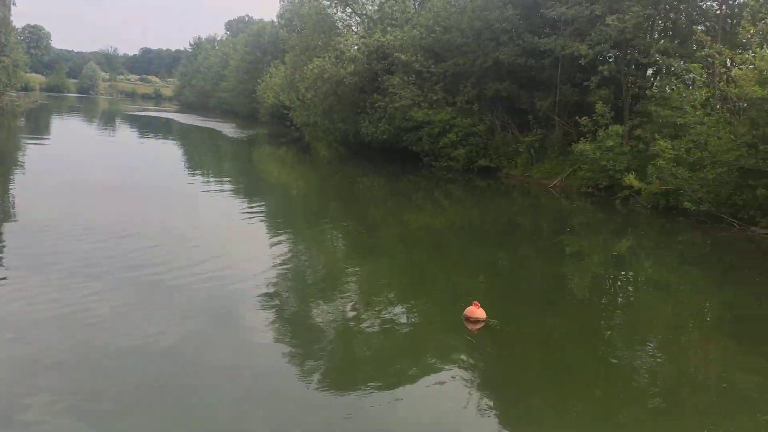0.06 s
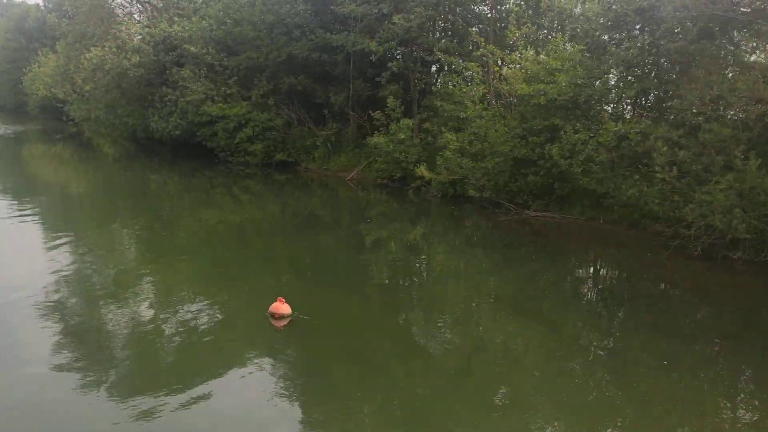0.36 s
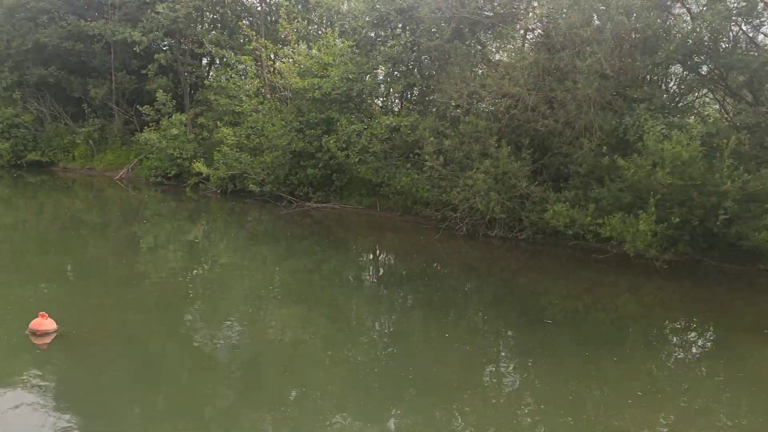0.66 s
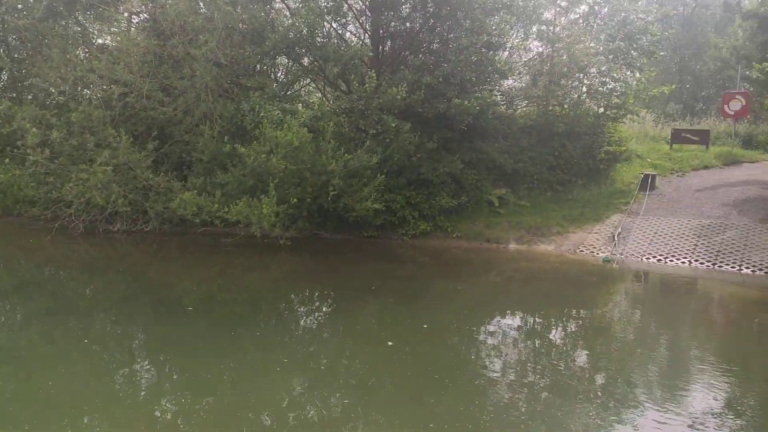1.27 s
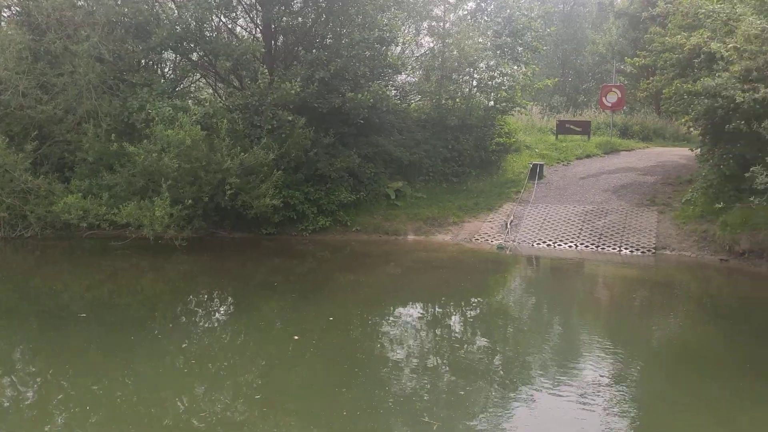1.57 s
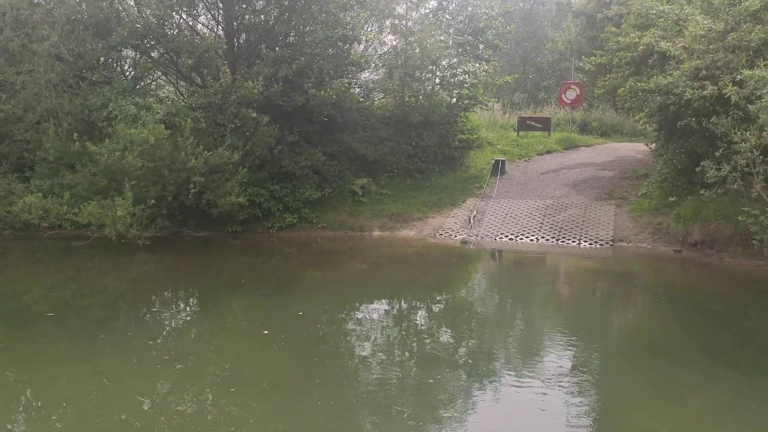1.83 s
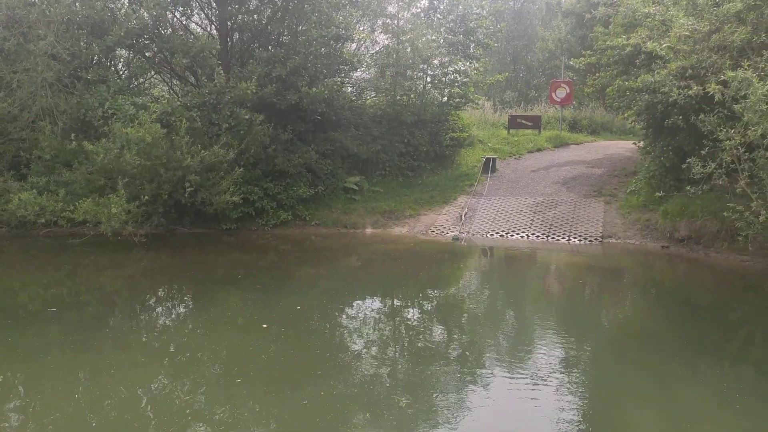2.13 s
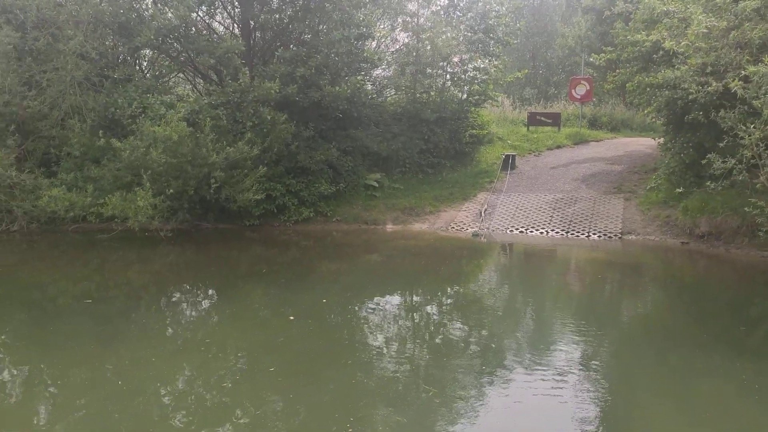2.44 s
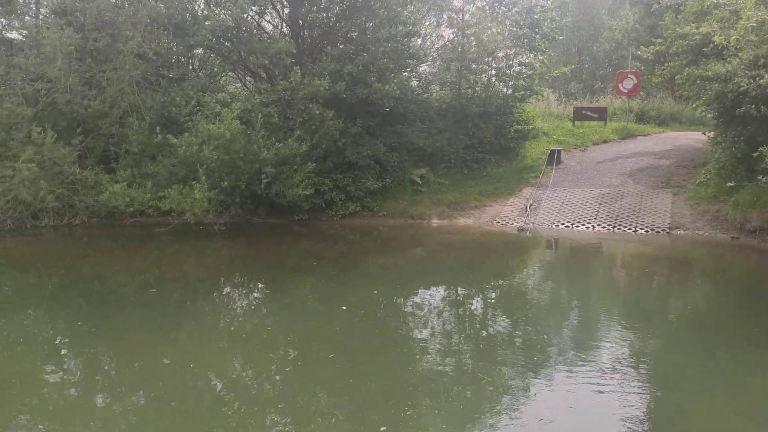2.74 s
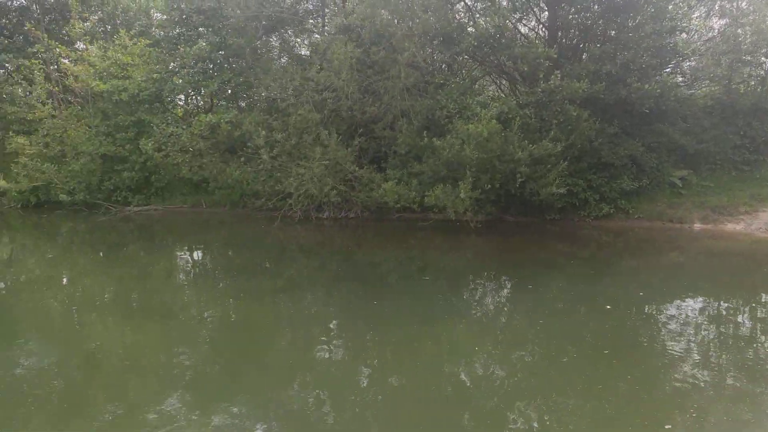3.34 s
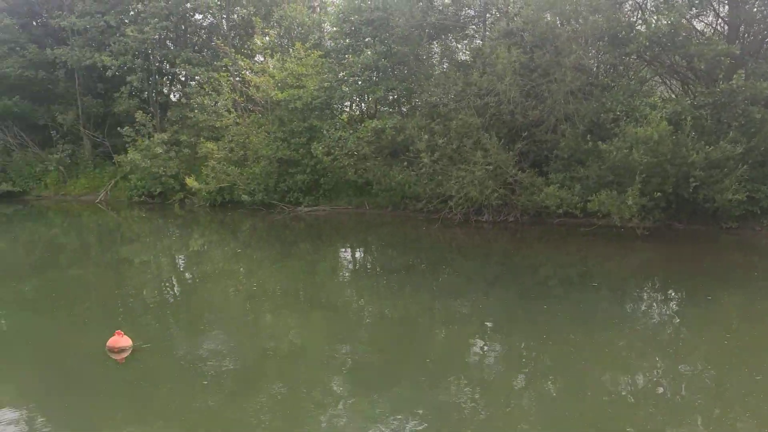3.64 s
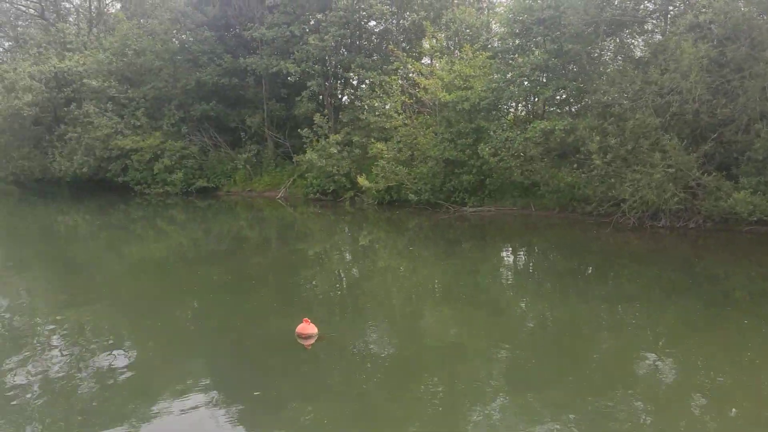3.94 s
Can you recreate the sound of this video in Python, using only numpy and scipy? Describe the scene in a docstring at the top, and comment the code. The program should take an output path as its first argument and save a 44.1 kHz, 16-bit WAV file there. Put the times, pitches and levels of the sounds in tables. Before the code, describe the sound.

Gritty rush of running water close by, with scuffs and knocks on the microphone.

```python
"""On the bank of a calm river, stereo microphones on a camera. From the start a gritty rush like running
water comes close by, in about twenty spurts a second, over a dull far-off drone and a little wind on
the microphones. Soon a hand bumps the camera, and scuffs and knocks follow, mostly on its right side.
The camera turns towards the rush, which slackens halfway and picks up again. Near the end come more
scuffs and a last bump, then a light, long, bright hiss in the rush as the camera turns away."""
import sys
import numpy as np
from scipy import signal
from scipy.fft import rfft, irfft
from scipy.io import wavfile
from scipy.ndimage import map_coordinates

SR = 44100
rng = np.random.default_rng(int(sys.argv[2]) if len(sys.argv) > 2 else 0)


def output_pcm(signal):
    """Save a mono or channel-first signal as 16-bit PCM at the path in sys.argv[1].

    Samples are clipped to [-1, 1] before scaling.
    """
    pcm = np.clip(np.atleast_2d(signal).T, -1, 1) * 32767
    wavfile.write(sys.argv[1], SR, np.round(pcm).astype(np.int16))


N = 176400
T = np.arange(N) / SR
HZ = np.maximum(np.fft.rfftfreq(N, 1 / SR), 1)

# lag of the left microphone as the camera turns towards the rush and back: t/s, delay/s
LEFT_DELAY = [(0, 0.00044), (.8, 0.00039), (1.1, .00029), (1.5, .00021), (2.0, 0.00019), (2.6, 0.0002),
              (3.05, 0.00022), (3.5, 0.0003), (3.75, 0.00036), (4, 0.00037)]
# strength of the close rush: t/s, level/dB
RUSH_LEVEL = [(0, -20), (.38, -17.5), (.6, -18.5), (.83, -21), (1.05, -21.5), (1.2, -21.5), (1.5, -18.3),
              (1.78, -22.5), (1.93, -19.5), (2.06, -27), (2.3, -26.5), (2.6, -19.5), (2.87, -18.5),
              (3.05, -19.5), (3.21, -22.5), (3.5, -23.5), (3.8, -19), (4, -17.5)]
# pace of its spurts: t/s, f/Hz
SPURT_PACE = [(0.0, 17.76), (0.15, 19.03), (0.4, 22.54), (0.6, 20.71), (0.8, 18.96), (1.0, 16.1),
              (1.2, 18.75), (1.45, 24.03), (1.7, 19.49), (1.95, 19.98), (2.2, 21.07), (2.5, 20.82),
              (2.8, 24.31), (3.05, 18.59), (3.3, 21.28), (3.55, 20.34), (3.75, 18.09), (4.0, 19.34)]
# unevenness of the flow, trough to crest of a spurt: t/s, swing/dB
SPURT_SWING = [(0, 1.5), (.3, 4), (1.0, 1.5), (1.25, 4.5), (1.75, 5.5), (2.05, 3), (2.5, 1), (2.95, 5),
               (3.25, -0.5), (3.55, 2), (4, -1)]
# colour of the rush, microphones turned away: f/Hz, left/dB, right/dB
RUSH_OFF_AXIS = [(150, -30, -30), (394, -17, -9), (710, -21, -15), (1230, -18, -14), (1800, -8, -9.5),
                 (2300, -1, -4), (2860, -1.5, -4.5), (3560, 0.5, -2.5), (4600, 1.5, -0.5), (5360, -3, -3),
                 (6200, -3, -3.5), (6760, -13, -16.5), (7560, -34, -13), (10000, -32, -19.5),
                 (12000, -46, -24.5), (14000, -41, -29), (15700, -46, -36)]
# colour of the rush, microphones facing it: f/Hz, left/dB, right/dB
RUSH_ON_AXIS = [(150, -25, -18.5), (395, -19, -19), (696, -18.5, -12.5), (1220, -9.5, -9.5),
                (1800, -3, -6.5), (2370, -1, -4.5), (2790, 3, -3.5), (3420, 1, -2), (3870, -0.5, -4),
                (4670, -3, -1), (5520, -5, -3.5), (6100, -1.5, -5), (6760, -6, -11), (7530, -23.5, -12),
                (10130, -29.5, -20), (12000, -46, -25.5), (14000, -41, -29), (15700, -46, -40)]
# strength of the far drone: t/s, level/dB
FAR_DRONE_LEVEL = [(0, -38.5), (.35, -39), (.9, -39), (1.8, -37.5), (2.15, -41.5), (2.6, -38.5), (3.2, -39),
                   (3.6, -38), (4, -38.5)]
# colour of the far drone: f/Hz, left/dB, right/dB
DRONE_COLOUR = [(30, -21, -26), (85, -8, -5.5), (130, -8, -8.5), (194, -5, -3), (260, -0.5, 0.5),
                (380, 1.5, 3.5), (434, -2, 1), (500, 2.5, 2), (560, -2.5, -1), (674, -4.5, -5.5),
                (1176, -3, -3), (2970, -36, -40), (8000, -37, -40)]
# strength of the whine in the drone: t/s, level/dB
FAR_WHINE_LEVEL = [(0, -39), (.25, -39), (.6, -54), (1.5, -42), (2.2, -52), (2.7, -42), (3.3, -52),
                   (4, -39)]
# strength of the wind on the microphones: t/s, level/dB
BREEZE_LEVEL = [(0, -47), (.8, -50.5), (1.6, -50), (2.2, -48), (3.1, -50.5), (3.6, -68), (4, -59)]
# colour of the wind: f/Hz, left/dB, right/dB
WIND_COLOUR = [(15, 1, 5.5), (35, -5, 1.5), (80, 0.5, -1), (160, -4.5, -4), (400, -26, -21),
               (2000, -60, -60)]
# puffs of wind: t/s, level/dB
WIND_PUFFS = [(.23, -44), (1.2, -40), (2.74, -52)]
# soft bumps of the hand on the camera: t/s, f/Hz, peak level/dB
HAND_BUMPS = [(0.344, 260, -34), (2.07, 186, -39.5), (3.566, 323, -33.5)]
# scuffs and knocks on the camera, except the last row, a light, long, bright hiss in the rush:
# t/s, hold/s, level/dB, release/s, treble gain/dB
SCUFFS_AND_HISS = [(0.486, 0.081, -19.5, 0.1, 2.5), (0.846, 0.0049, -14.5, 0.045, 6),
                   (0.948, 0.065, -18.5, 0.054, -3), (1.028, .005, -20.5, 0.0088, 1),
                   (1.65, 0.0045, -17.5, 0.0066, -26), (1.699, .004, -23, 0.017, -20),
                   (1.894, .02, -19, 0.016, 2), (1.919, 0.025, -15.5, .012, 2.5),
                   (2.152, .005, -24.5, 0.041, -18), (2.237, .01, -32, .03, 3),
                   (2.718, 0.011, -15.5, 0.018, 0), (2.747, 0.018, -18.5, .025, 4),
                   (3.03, .02, -18.5, 0.06, 1.5), (3.256, 0.035, -19.5, .02, 1.5),
                   (3.293, 0.05, -15.5, 0.01, 2.5), (3.38, .012, -25, 0.033, 2),
                   (3.52, 0.0068, -20, 0.014, -2), (3.567, 0.015, -16.5, 0.027, -0.5),
                   (3.627, 0.093, -31, .1, 3)]
# colour of the scuffs and that hiss: f/Hz, left/dB, right/dB
BURST_COLOUR = [(150, -57, -26), (400, -17, -7.5), (800, -16, -9.5), (1720, -9, -8.5), (3300, 2.5, 2),
                (4500, 1.5, 1.5), (6230, 2.5, 0), (7730, -18, -8.5), (9700, -28, -11.5), (11900, -37, -17),
                (13900, -38, -19), (15700, -38, -34)]


def from_db(db):
    """Decibels to gain."""
    return 10 ** (np.asarray(db) / 20)


def unit_rms(x):
    """Scale to unit power."""
    return x / np.sqrt(np.mean(x ** 2) + 1e-20)


def in_time(rows):
    """Join (t/s, value) points by straight lines."""
    return np.interp(T, *np.transpose(rows))


def drift(rate_hz):
    """Random wander with spread 1, mostly slower than rate_hz."""
    return unit_rms(irfft(rfft(rng.standard_normal(N)) / (1 + (HZ / rate_hz) ** 2), N))


def colour(x, table):
    """Filter each side by its column of a spectrum, keeping the power of white noise."""
    hz, *sides = np.transpose(table)
    gains = from_db([np.interp(np.log(HZ), np.log(hz), side) for side in sides])
    return irfft(rfft(x) * unit_rms(gains), N)


def stereo_noise(alike):
    """White noise whose shared part reaches the left microphone later, as the camera turns."""
    shared = rng.standard_normal(N)
    late = map_coordinates(shared, [(T - in_time(LEFT_DELAY)) * SR], order=3, mode="mirror")
    return np.sqrt(alike) * np.array([late, shared]) + np.sqrt(1 - alike) * rng.standard_normal((2, N))


def grit(per_s, spread_db, grain_s, share, alike):
    """Hiss with a share of its power in tiny random bursts; spread_db varies them by burst and side."""
    born = rng.random(N) < per_s / SR
    scatter = np.minimum(rng.exponential(1, N), 4) + 0.68 * rng.standard_normal((2, N))
    bursts = born * from_db(spread_db * scatter) ** 2
    power = signal.lfilter([1], [1, -np.exp(-1 / (grain_s * SR))], bursts + 1e-18)
    return stereo_noise(alike) * np.sqrt(1 - share + share * power / power.mean())


def ring(clicks, hz, t60_s):
    """A unit click sets a sine of height 1 ringing; it falls 60 dB in t60_s."""
    decay, step = from_db(-60 / (t60_s * SR)), 2 * np.pi * hz / SR
    return signal.lfilter([0, np.sin(step)], [1, -2 * decay * np.cos(step), decay ** 2], clicks + 1e-18)


def droplets(per_s=1200, spread_db=3, ring_cycles=16.6, band_hz=(2930, 6720), pitches=24):
    """Tiny pings at many pitches, of unequal strength at the two microphones."""
    born = rng.random(N) < per_s / SR
    signs = rng.choice([-1, 1], N)
    scatter = np.minimum(rng.exponential(1, N), 3.5) + 0.63 * rng.standard_normal((2, N))
    clicks = born * signs * from_db(spread_db * scatter)
    pitch_index = rng.integers(0, pitches, N)
    left, right = sum(np.sqrt(hz) * ring(clicks * (pitch_index == k), hz, ring_cycles / hz)
                      for k, hz in enumerate(np.geomspace(*band_hz, pitches)))
    late_left = np.interp(T - in_time(LEFT_DELAY), T, left)
    return unit_rms(np.array([late_left, right]))


def close_rush(rise_share=0.19, facing_lag_s=0.00034, averted_lag_s=0.00037):
    """Close spatter in spurts that swell fast and sink slower; its colour follows the camera's turn."""
    cycle = (np.cumsum(in_time(SPURT_PACE)) / SR) % 1
    spurt = np.interp(cycle, [0, rise_share, 1], [-.5, .5, -.5])
    level_db = in_time(RUSH_LEVEL) + in_time(SPURT_SWING) * spurt + 0.34 * drift(rate_hz=64)
    hiss = grit(per_s=1500, spread_db=3.5, grain_s=0.00059, share=0.39, alike=0.27)
    spray = from_db(level_db) * (from_db(-2) * hiss + from_db(-9) * droplets())
    averted = np.interp(in_time(LEFT_DELAY), [facing_lag_s, averted_lag_s], [0, 1])
    return (1 - averted) * colour(spray, RUSH_ON_AXIS) + averted * colour(spray, RUSH_OFF_AXIS)


def far_drone(whine_hz=1442, width_hz=16, alike=0.92):
    """A dull drone like far traffic, with a faint whine in it, much alike at both microphones."""
    whine_band = rfft(stereo_noise(alike=0.96)) / (1 + ((HZ - whine_hz) / width_hz) ** 2)
    whine = from_db(in_time(FAR_WHINE_LEVEL)) * unit_rms(irfft(whine_band, N))
    air = np.sqrt(alike) * rng.standard_normal(N) + np.sqrt(1 - alike) * rng.standard_normal((2, N))
    return from_db(in_time(FAR_DRONE_LEVEL)) * colour(air, DRONE_COLOUR) + whine


def microphone_wind(gust_db=3.5, puff_s=0.014):
    """Light lumpy rumble of wind right on the microphones, with a few puffs."""
    breeze = from_db(in_time(BREEZE_LEVEL) + gust_db * drift(rate_hz=3.5))
    puffs = sum(from_db(db) * np.exp(-.5 * ((T - s) / puff_s) ** 2) for s, db in WIND_PUFFS)
    return colour((breeze + puffs) * stereo_noise(alike=.1), WIND_COLOUR)


def hand_bumps():
    """Dull thuds of the hand, carried through the camera body to both microphones."""
    return sum(from_db(db) * ring(np.arange(N) == int(s * SR), hz, t60_s=0.22)
               for s, hz, db in HAND_BUMPS)


def scuffs_and_hiss(attack_s=0.0029, treble_hz=6770):
    """Gritty bursts: rubs and knocks on the camera, then a light, bright hiss in the rush near the end."""
    body_power, treble_power = np.zeros(N), np.zeros(N)
    for start, hold, db, release, treble_db in SCUFFS_AND_HISS:
        attack = np.clip((T - start) / attack_s + .5, 0, 1)
        envelope = from_db(db) * attack * np.exp(-np.maximum(T - start - hold, 0) / release)
        body_power += envelope ** 2
        treble_power += (envelope * from_db(treble_db)) ** 2
    noise = grit(per_s=1000, spread_db=0, grain_s=0.0012, share=0.8, alike=0.25)
    body = irfft(rfft(noise) / (1 + (HZ / treble_hz) ** 6), N)
    treble = noise - body
    return colour(body * np.sqrt(body_power) + treble * np.sqrt(treble_power), BURST_COLOUR)


def near_echoes(x, count=8, span_s=0.014):
    """A few weak early reflections, different at each microphone, that ripple the treble."""
    lags = rng.uniform(0.0986, 1, (count, 2, 1)) * span_s
    echoes = np.exp(-2j * np.pi * HZ * lags).sum(axis=0) / np.sqrt(count)
    gain = from_db(-6) * HZ / (HZ + 1500)
    return irfft(rfft(x) * (1 + gain * echoes) / np.sqrt(1 + gain ** 2), N)


def scene():
    """The river bank at the microphones; only the rush, its hiss and the scuffs have reflections."""
    close = near_echoes(close_rush() + scuffs_and_hiss())
    return close + far_drone() + microphone_wind() + hand_bumps()


def record(dry):
    """Softly round the highest peaks and cut the top treble steeply."""
    ceiling, cutoff_hz = 1.2, 16400
    rounded = dry / (1 + (dry / ceiling) ** 4) ** .25
    return signal.sosfilt(signal.cheby2(16, 70, cutoff_hz, fs=SR, output="sos"), rounded)


dry = scene()
out = record(dry)
output_pcm(out)
```